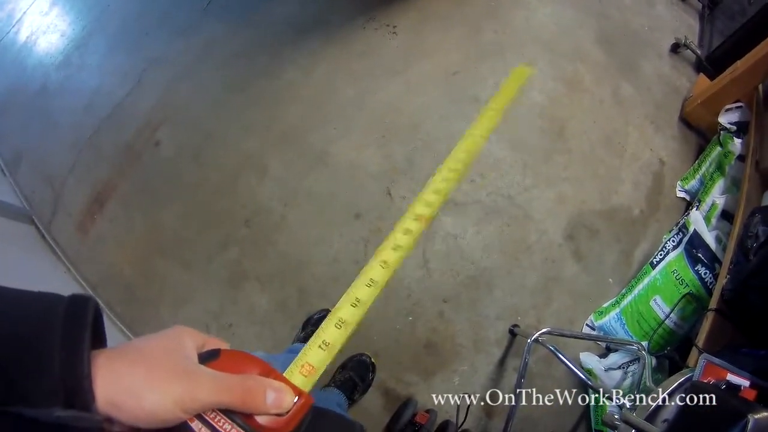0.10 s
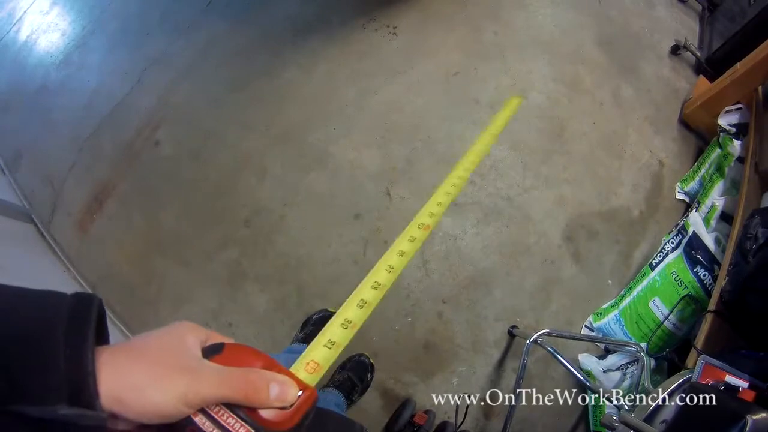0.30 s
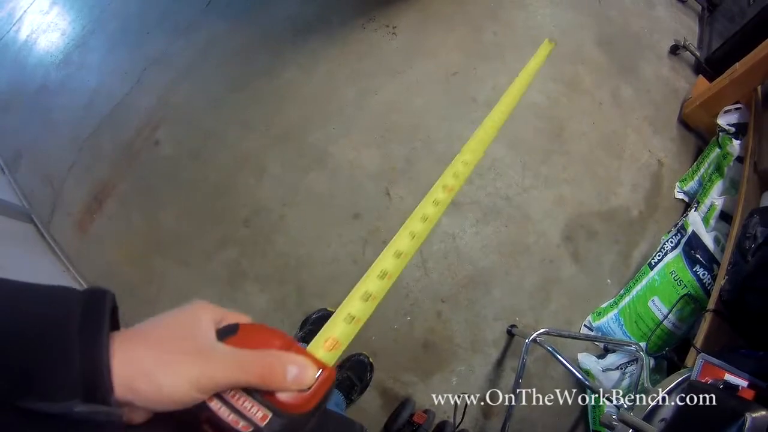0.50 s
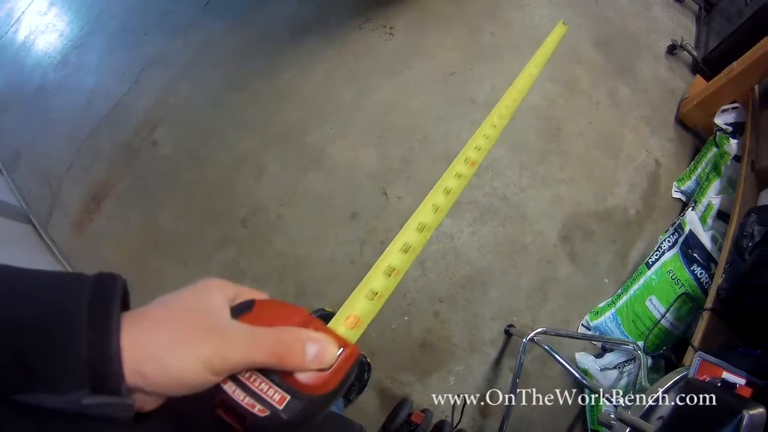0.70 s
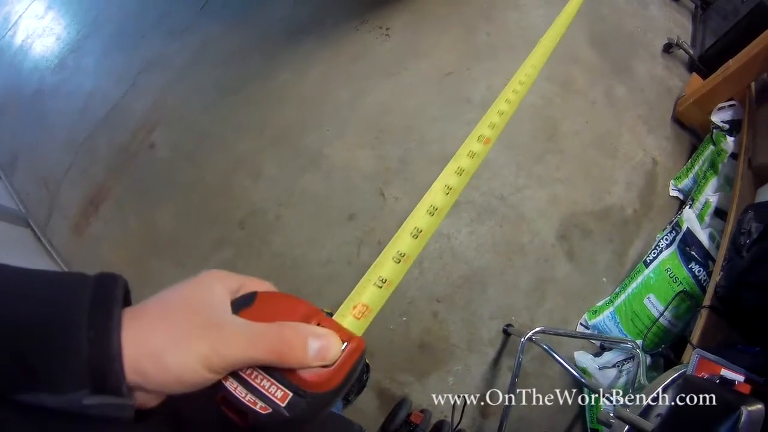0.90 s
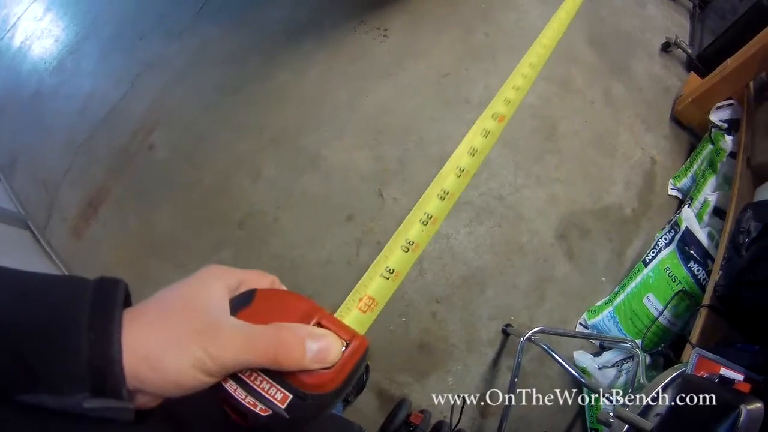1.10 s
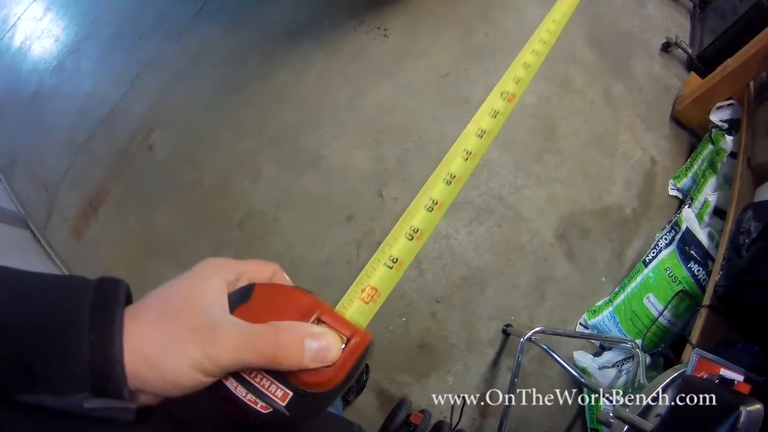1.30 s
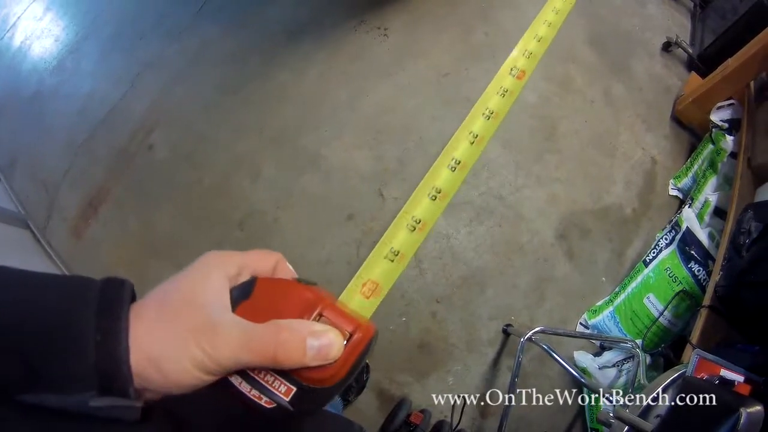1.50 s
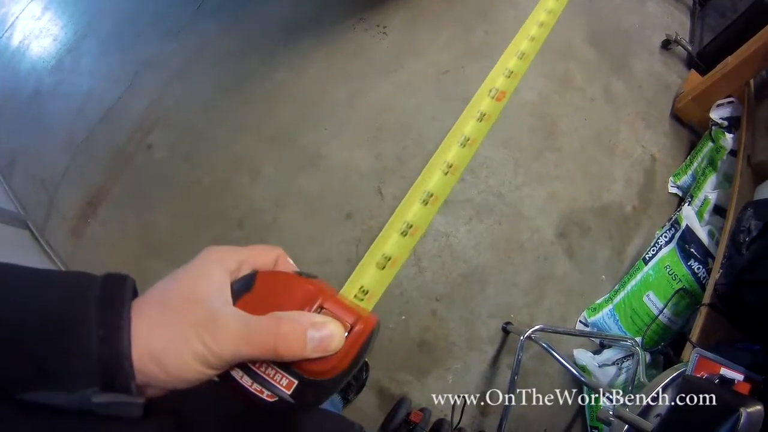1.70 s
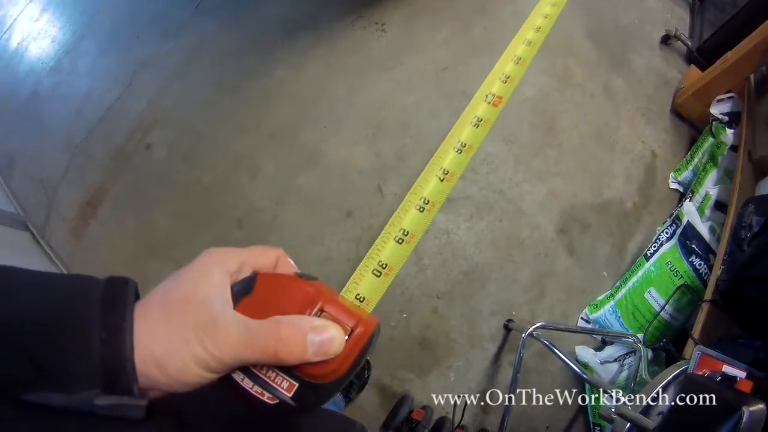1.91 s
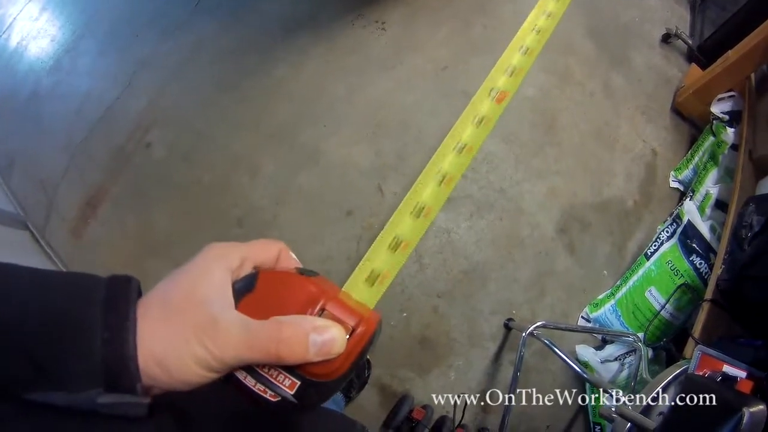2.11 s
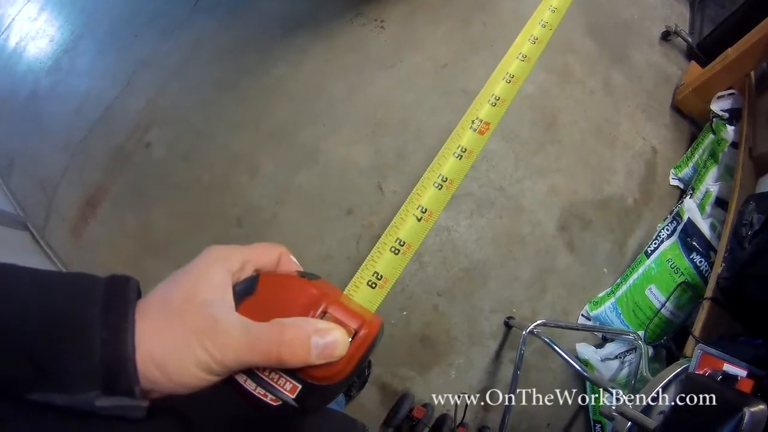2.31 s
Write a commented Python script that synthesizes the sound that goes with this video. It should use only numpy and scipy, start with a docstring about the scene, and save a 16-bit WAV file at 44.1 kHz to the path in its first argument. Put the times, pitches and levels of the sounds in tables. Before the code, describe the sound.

A metal tape measure blade rattles and clatters in two quick bursts, then slides softly twice.

```python
"""A low garage hum, microphone hiss and a thin wavering whine last throughout, made of shaped noise and a sine.
A steel tape blade at once flexes and rattles in two spurts: coloured noise, many short pings and ringing knocks.
Two soft low thuds of the case fall within the spurts, then the blade settles with small knocks.
Last it slides twice, softly, through the mouth of its plastic case, as resonant friction noise with a few knocks.
A faint garage echo follows every blade sound; both channels are alike."""
import sys
import numpy as np
from scipy import signal
from scipy.fft import rfft, irfft, next_fast_len
from scipy.io import wavfile
from scipy.ndimage import uniform_filter1d, map_coordinates

SR = 44100
rng = np.random.default_rng(int(sys.argv[2]) if len(sys.argv) > 2 else 0)


def magnitude_from_level(level_db):
    """Linear magnitude for a level in decibels (20 dB per decade)."""
    exponent = np.asarray(level_db, float) / 20
    return 10 ** exponent


def master(y):
    """Save y as 16-bit WAV."""
    cut = np.clip(np.atleast_2d(y).T, -1, 1)
    pcm = np.round(cut * 32767)  # scale
    wavfile.write(sys.argv[1], SR, pcm.astype(np.int16))


N = 110250  # samples, 2.5 s
QUIET_TOP_HZ = 15100  # upper band limit of the two quiet noises, hiss and slide
CONTACT_ATTACK_S = 0.000296  # time constant of the onset of pings and knocks


def unit(x):
    """Normalisation: bring the effective (rms) value to 1."""
    return x / np.sqrt(np.mean(x ** 2) + 1e-20)


def along(points, hz):
    """Interpolation: read (Hz, value) points on a logarithmic frequency axis."""
    f, v = np.transpose(points)
    return np.interp(np.log(hz + 1), np.log(f + 1), v)


def curves(rows):
    """Envelopes: one value per sample for each column after the time."""
    s, *cols = np.transpose(rows)
    return [np.interp(np.arange(N) / SR, s, c) for c in cols]


def wobble(rate):
    """Slow random fluctuation: a smooth curve through rate random knots a second."""
    knots = rng.standard_normal(int(N * rate / SR) + 4)
    return map_coordinates(knots, [np.arange(N) * rate / SR])


def filtered(x, response):
    """Linear filtering: the spectrum of x times a response of frequency."""
    m = next_fast_len(N + 8192)
    hz = np.fft.rfftfreq(m, 1 / SR)
    return irfft(rfft(x, m) * response(hz), m)[:N]


def resonance(hz, centre, width):
    """Damped resonance: the causal response of one mode, with its width in Hz."""
    return 1j * hz * width / (centre * centre - hz * hz + 1j * hz * width)


def rub(rows, response, flutter_db, patchy_db):
    """Friction: noise of fluctuating strength excites a body, then is made patchy, tilted and swelled."""
    level_db, tilt_db = curves(rows)
    t = np.arange(N) / SR
    flutter = .35 * wobble(70) + wobble(400)
    grit = rng.standard_normal(N) * magnitude_from_level(flutter_db * flutter)
    hz, s, z = signal.stft(unit(filtered(grit, response)), SR, nperseg=256)
    # random gains, smoothed across frequency and then time
    patches = uniform_filter1d(rng.standard_normal(z.shape), size=2, axis=0)
    patches = unit(uniform_filter1d(patches, size=4, axis=1))
    tilt = np.log2((hz[:, None] + 200) / 5000) * np.interp(s, t, tilt_db)
    body = signal.istft(z * magnitude_from_level(patchy_db * patches + tilt), SR, nperseg=256)[1][:N]
    return body * magnitude_from_level(level_db) * (t >= rows[0][0]) * (t <= rows[-1][0])


# Swell of the garage hum. Each row: time in seconds, mean level in dB.
HUM_LEVEL = [(0, -60.5), (.5, -56.5), (.9, -60.5), (1.2, -64), (1.55, -65), (1.8, -60), (2.5, -62)]
# Spectrum of the hum before its band limits. Each row: frequency in Hz, relative density in dB per Hz.
HUM_SPECTRUM = [(12, -26), (20, -1.5), (92, -6.5), (130, -6.5), (211, -8.5), (335, -12), (422, -13.5),
                (640, -17.5), (788, -19.5), (884, -21), (5000, -38.5), (6500, -70), (11000, -120)]


def hum():
    """Shaped noise: a low random hum of fixed spectrum swells slowly and wavers slightly."""
    def response(hz):
        return magnitude_from_level(along(HUM_SPECTRUM, hz)) * (hz > 12) / (1 + (hz / 5000) ** 4)
    noise = unit(filtered(rng.standard_normal(N), response))
    return noise * magnitude_from_level(curves(HUM_LEVEL)[0] + 0.31 * wobble(5.35))


# Spectrum of the hiss before its band limits. Each row: frequency in Hz, relative density in dB per Hz.
HISS_SPECTRUM = [(1180, -39), (2000, -7.5), (3810, -4.5), (4410, -4.5), (5800, -7.5), (14000, -8.5),
                 (15600, -13.5)]


def hiss():
    """Self-noise: the microphone adds steady random noise weighted to the treble."""
    def response(hz):
        return magnitude_from_level(along(HISS_SPECTRUM, hz)) * hz / (hz + 1500) * (hz < QUIET_TOP_HZ)
    return magnitude_from_level(-77) * unit(filtered(rng.standard_normal(N), response))


def whine():
    """Frequency and amplitude modulation: a high sine wavers in pitch and level."""
    pitch_hz = 13717 + 6 * wobble(rate=20)
    level_db = -82.5 + 2 * wobble(rate=10)  # level of the sine's peak
    return np.sin(2 * np.pi * np.cumsum(pitch_hz) / SR) * magnitude_from_level(level_db)


# Decay of the garage echo. Each row: frequency in Hz, time to die by 60 dB in seconds.
GARAGE_DECAY = [(500, 3.4), (1200, 1.4), (2500, 0.48), (12000, .4)]


def garage(x):
    """Reverberation: walls and floor answer a little later, each frequency dying at its own speed."""
    hz, t, z = signal.stft(rng.standard_normal(SR // 2), SR, nperseg=256)
    decay = magnitude_from_level(-60 * t / along(GARAGE_DECAY, hz)[:, None])
    tail = signal.istft(z * decay, SR, nperseg=256)[1]
    delayed = np.pad(x, (300, 0))  # samples, about 7 ms
    return signal.fftconvolve(delayed, tail / np.linalg.norm(tail))[:N]


# Low thuds of the case in the hand. Each row: start in seconds, initial amplitude in dB,
# frequency in Hz, time to die by 60 dB in seconds.
CASE_THUDS = [(.2, -59, 192, .15), (.41, -52, 47.6, 0.22)]


def thuds():
    """Damped oscillation: the case jolts in the hand, a soft low push."""
    t = np.arange(N) / SR
    out = np.zeros(N)
    for s, db, hz, t60 in CASE_THUDS:
        decay = magnitude_from_level(db - 60 * np.abs(t - s) / t60)
        out += decay * np.sin(2 * np.pi * hz * (t - s)) * (t > s)
    return out


# The blade sliding through the case mouth. Each row: time in seconds, level in dB,
# tilt in dB per octave about 5 kHz.
SLIDE_MOTION = [(1.57, -87.5, 0), (1.62, -71.5, -0.5), (1.66, -59.5, 0), (1.72, -53, 1), (1.77, -57.5, 0),
                (1.82, -66, -1.5), (1.88, -67.5, -2), (1.95, -76.5, -2), (2.05, -89, -4.5), (2.13, -75, 0),
                (2.2, -65, 0), (2.26, -59.5, 1), (2.31, -56.5, 1), (2.345, -59.5, 1), (2.385, -70, 0),
                (2.41, -68.5, -2), (2.46, -81, -1), (2.5, -71, -4)]
# Spectrum of the scrape before the mouth. Each row: frequency in Hz, relative density in dB per Hz.
SLIDE_SPECTRUM = [(530, -23), (900, -1.5), (1120, -14.5), (1840, -3.5), (2930, -4), (3950, -2.5),
                  (6070, -1.5), (10000, -8), (15600, -18.5)]
# Resonances of the case mouth. Each row: frequency in Hz, width in Hz, relative strength in dB.
MOUTH_MODES = [(2060, 940, 2.5), (4230, 680, 1), (6000, 880, -3), (8500, 370, 1.5), (10130, 690, -2)]


def slide():
    """Friction through resonators: the blade scrapes the case mouth, whose modes colour the noise."""
    def response(hz):
        modes = sum(magnitude_from_level(db) * abs(resonance(hz, c, w)) for c, w, db in MOUTH_MODES)
        return magnitude_from_level(along(SLIDE_SPECTRUM, hz)) * (1 + 0.73 * modes) * (hz < QUIET_TOP_HZ)
    return rub(SLIDE_MOTION, response, flutter_db=0.6, patchy_db=1.0)


# Rattle of the loose blade. Each row: time in seconds, level in dB before the trim in scene(),
# tilt in dB per octave about 5 kHz. The chatter follows the level column alone.
RATTLE_MOTION = [(0, -55.5, -1.5), (.03, -59.5, -3.5), (.05, -54.5, -1.5), (.075, -68.5, 2),
                 (.11, -71.5, -3), (.154, -68, 0), (.16, -55.5, 0), (.192, -51, -1.5), (.2, -41.5, -0.5),
                 (.225, -39, 0), (.27, -44, 0), (.29, -50.5, -0.5), (.34, -59, -2.5), (.352, -42.5, 4),
                 (.378, -45, 0), (.4, -38, -2), (.41, -31, 2), (.422, -30.5, 1.5), (.438, -33, 1),
                 (.46, -31.5, 2), (.5, -37, 0.5), (.545, -42, -1.5), (.57, -42.5, -2), (.6, -54, -1),
                 (.609, -50, -2.5), (.625, -45.5, -1.5), (.645, -53.5, -2), (.66, -55, -1.5),
                 (.68, -56.5, -1.5), (.697, -54, -3.5), (.735, -67, 1), (.75, -60.5, 2), (.775, -60.5, -5),
                 (.795, -57.5, 0), (.825, -68, -1), (.845, -63, -1), (.88, -70, 0), (.895, -67.5, 3),
                 (.93, -75, -1), (.985, -76, 2), (.995, -67, 0), (1.02, -77, -4.5), (1.1, -78.5, -7)]
# Spectrum of the clatter before the modes. Each row: frequency in Hz, relative density in dB per Hz.
RATTLE_SPECTRUM = [(180, -47.5), (300, -14), (757, -12.5), (986, -16.5), (2180, -5.5), (5680, -3.5),
                   (7040, -4), (11200, -8.5), (13900, -14), (15600, -25.5)]
# What the blade rings with. Each row: frequency in Hz, relative level in dB,
# time to die by 60 dB in seconds. Rattle and chatter use the frequencies, the knocks every column.
BLADE_MODES = [(2472, -1, 0.018), (2934, -2, 0.026), (3350, -3.5, .03), (3885, -2, 0.035),
               (4130, 1.5, 0.03), (4600, 1, 0.024), (5050, -2.5, 0.04), (5500, -4, 0.014),
               (6170, -4.5, .03), (6680, -1.5, 0.034), (7270, -1.5, .03), (8600, -5.5, .025),
               (10800, -1, .025), (12100, -4.5, .02)]


def rattle():
    """Modal excitation by noise: dense small contacts shake the blade's modes above a broad clatter."""
    def response(hz):
        modes = abs(sum(resonance(hz, c, 46) for c, db, t60 in BLADE_MODES))
        return magnitude_from_level(along(RATTLE_SPECTRUM, hz)) * (4.5 + 1.6 * modes)
    return rub(RATTLE_MOTION, response, flutter_db=1.0, patchy_db=0.98)


def chatter():
    """Random impacts: small contacts inside the rattle, each a short ping near one blade mode."""
    contacts_per_s, t60_s, detune = 700, 0.0279, .03  # detune: largest fraction of the frequency
    below_rattle_db, scatter_db = 5.5, 1.5
    span_s, t = RATTLE_MOTION[-1][0], np.arange(SR // 25) / SR
    draw = rng.random((int(contacts_per_s * span_s), 4))
    start = (draw[:, 0] * span_s * SR).astype(int)
    mode = (draw[:, 1] * len(BLADE_MODES)).astype(int)
    hz = np.array(BLADE_MODES)[mode, 0] * (1 + detune * (2 * draw[:, 2] - 1))
    db = curves(RATTLE_MOTION)[0][start] - below_rattle_db
    db = db - scatter_db * np.log(draw[:, 3] + 1e-3)
    db = db - (hz / 4500) ** 2  # higher pings are weaker
    pings = magnitude_from_level(db[:, None] - 60 * t / t60_s) * np.sin(2 * np.pi * hz[:, None] * t)
    pings = pings * (1 - np.exp(-t / CONTACT_ATTACK_S))
    places = start[:, None] + np.arange(len(t))
    return np.bincount(places.ravel(), pings.ravel(), N + SR)[:N]


# Knocks of the blade. Each row: start in seconds, nominal level in dB before the band limits,
# pitch struck most in Hz, spread of rung modes in octaves (at least 0.05), share of broad crack from 0 to 1.
BLADE_KNOCKS = [(.0398, -59, 9400, 0.5, .3), (.1172, -47, 10800, 0.15, 0.32), (.119, -54, 3900, .15, .1),
                (.162, -40, 3130, 0.18, 0.28), (.1945, -29, 2500, 0.35, 0.16),
                (.2016, -29.5, 3470, 0.77, .3), (.218, -37.5, 10500, .3, .2), (.3461, -38, 8700, .6, 0.55),
                (.3455, -42, 3000, 0.11, .1), (.3524, -38.5, 4840, .15, .2), (.384, -30, 2920, 0.16, 0.24),
                (.3975, -23, 3070, .2, .15), (.412, -15, 2790, .2, 0.14), (.4145, -16.5, 2686, 0.16, 0.32),
                (.4215, -25, 2996, 0.16, .2), (.426, -18.5, 6900, 0.14, .2),
                (.4402, -23.5, 3000, .15, 0.11), (.4464, -23.5, 2500, 0.23, 0.11),
                (.4544, -19.5, 4600, 0.61, 0.35), (.4624, -20, 7500, .3, 0.305),
                (.4862, -25, 2450, 0.17, 0.084), (.5575, -27.5, 5440, 0.22, .15),
                (.612, -31, 2450, 0.18, 0.087), (.618, -40, 4600, 0.14, 0.11),
                (.6648, -40.5, 2450, 0.14, .1), (.6858, -39.5, 3350, 0.088, .1), (.6954, -45, 7500, .3, .3),
                (.7445, -42, 6000, 0.88, 0.46), (.752, -48, 5050, .1, .1), (.7791, -52, 2500, .3, .2),
                (.7934, -46, 6900, 0.81, .4), (.835, -53, 6000, .6, 0.51), (.8424, -55, 7000, 0.58, 0.44),
                (.8864, -52.5, 5030, 0.27, .3), (.8944, -61, 6900, 0.53, .4), (.9574, -60, 5500, .5, 0.45),
                (.9901, -48, 5460, 1.02, 0.69), (.9974, -55, 6000, .7, 0.44),
                (1.8396, -52, 5070, 0.074, .1), (1.853, -44.5, 4130, .1, 0.37), (2.1074, -51, 8500, .5, .3),
                (2.108, -51.5, 5100, .2, .2), (2.328, -58.5, 4130, 0.064, .1),
                (2.3943, -46, 4800, 0.45, 0.53), (2.4816, -51, 5030, 0.34, 0.34)]


def knocks():
    """Modal impact: each knock rings the modes near its pitch and adds a short broad crack."""
    crack_t60_s, lowest_hz = .015, 1680
    out, t = np.zeros(N + SR), np.arange(SR // 10) / SR
    hz, level_db, t60 = np.transpose(BLADE_MODES)[:, :, None]
    for s, db, pitch, spread, share in BLADE_KNOCKS:
        near = np.exp(-.5 * (np.log2(hz / pitch) / max(spread, .05)) ** 2)
        size = near * magnitude_from_level(level_db + 1.1 * rng.standard_normal(hz.shape))
        waves = np.sin(2 * np.pi * (hz * t + rng.random(hz.shape)))
        tone = np.sum(size * magnitude_from_level(-60 * t / t60) * waves, axis=0) / np.sqrt(np.sum(near ** 2))
        crack = rng.standard_normal(len(t)) * magnitude_from_level(-60 * t / crack_t60_s)
        share = np.clip(share, 0, 1)
        knock = (1 - share) * tone + share * crack
        out[round(s * SR):][:len(t)] += magnitude_from_level(db) * knock * (1 - np.exp(-t / CONTACT_ATTACK_S))

    def response(f):
        high_pass = (f * f / (f * f - lowest_hz ** 2 - 1.3j * f * lowest_hz)) ** 2
        return high_pass / (1 + (f / 12000) ** 8)
    return filtered(out[:N], response)


def scene():
    """Superposition: the blade, its garage echo, the thuds and the background, alike in both channels."""
    tape = magnitude_from_level(-0.5) * rattle() + chatter() + slide() + knocks()
    echo = magnitude_from_level(-15) * garage(tape)
    background = hum() + hiss() + whine()
    return np.tile(tape + echo + thuds() + background, (2, 1))


def top_cut(x):
    """Nothing passes above the cut-off."""
    return signal.sosfilt(signal.butter(12, 15720, fs=SR, output="sos"), x)


def record(dry):
    """Transmission: the finished mix passes through the last stage of the chain."""
    return top_cut(dry)


dry = scene()
out = record(dry)
master(out)
```